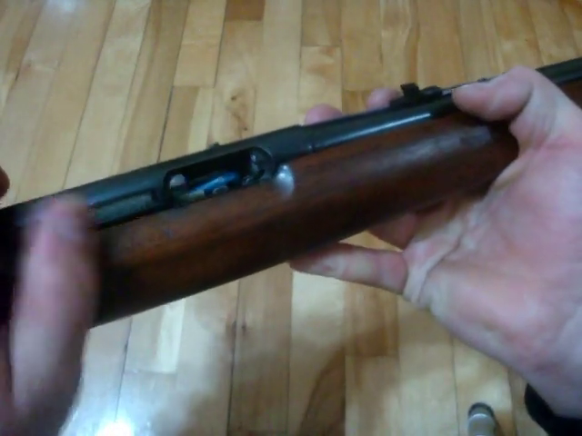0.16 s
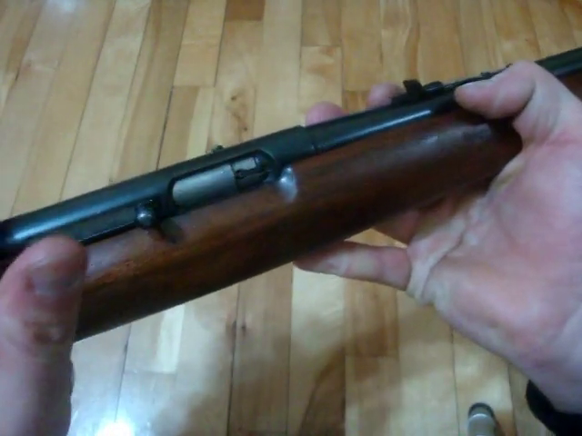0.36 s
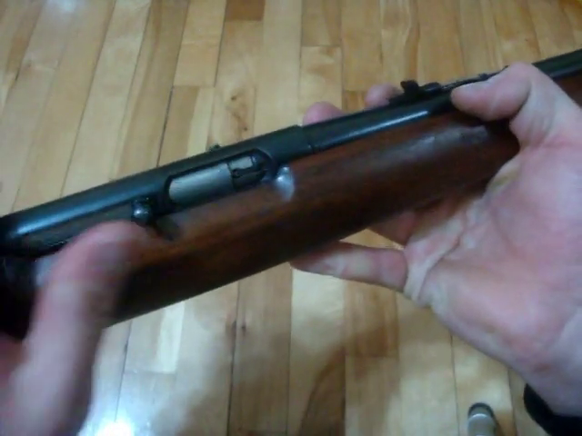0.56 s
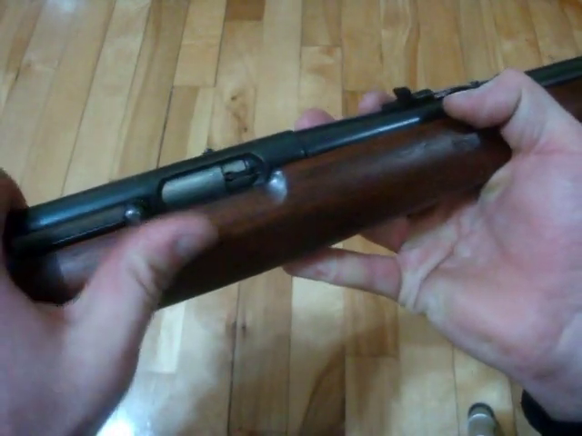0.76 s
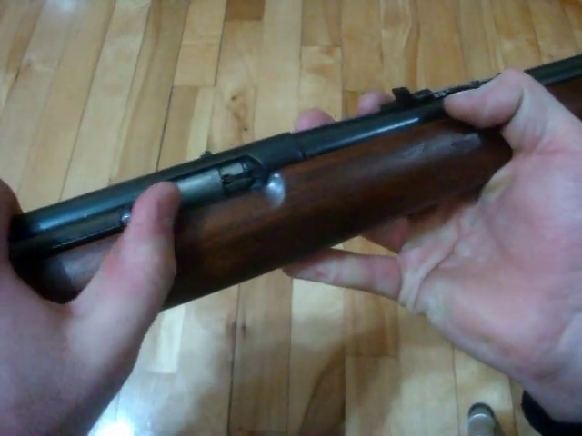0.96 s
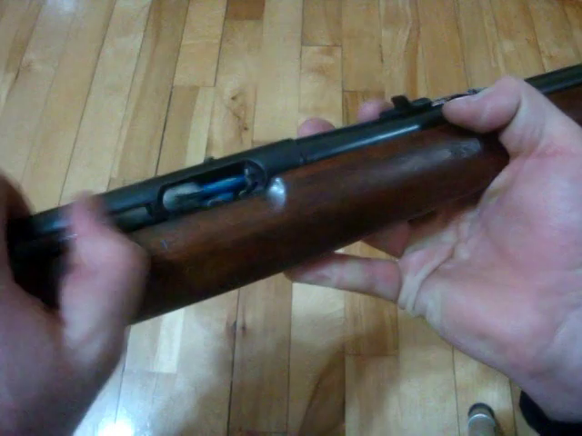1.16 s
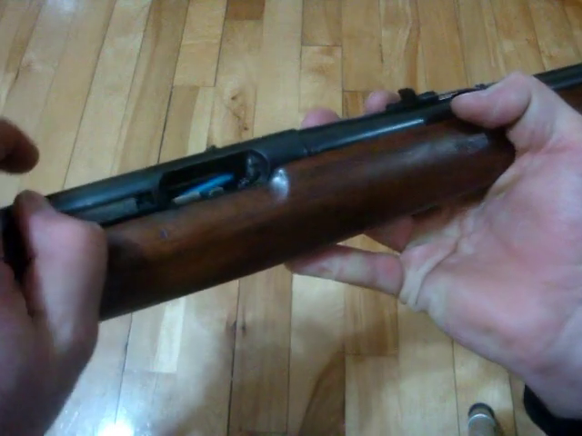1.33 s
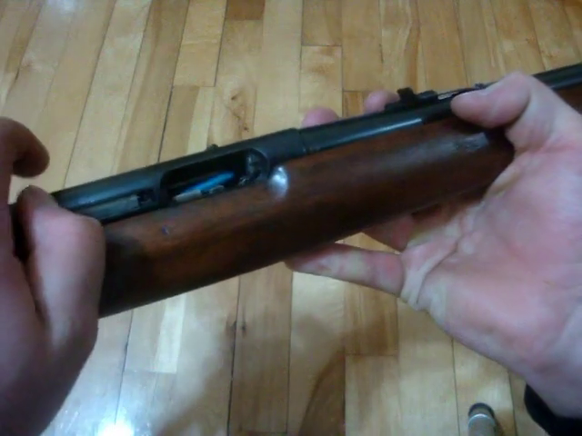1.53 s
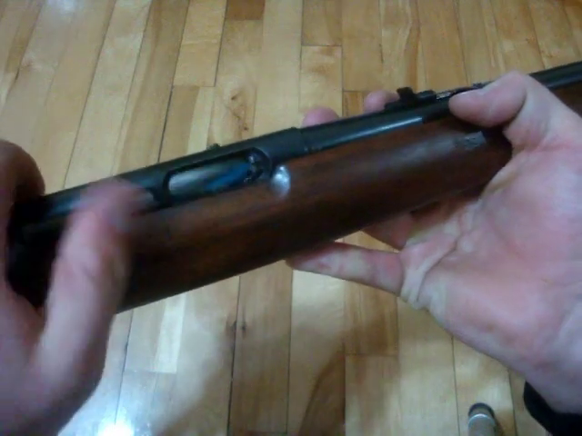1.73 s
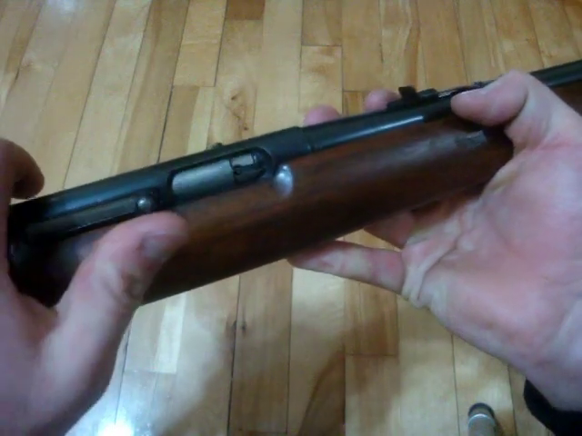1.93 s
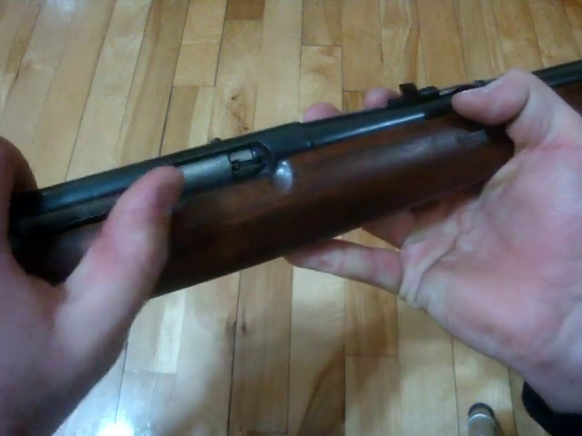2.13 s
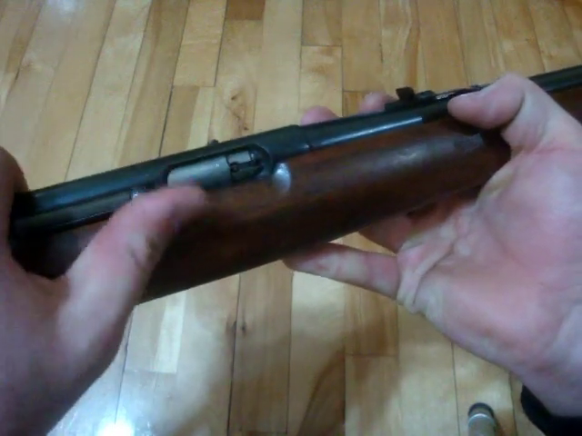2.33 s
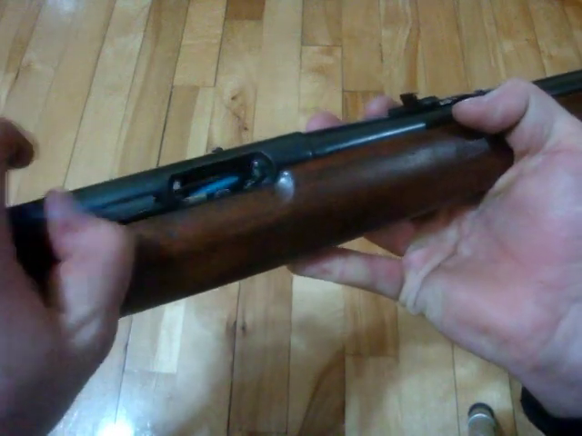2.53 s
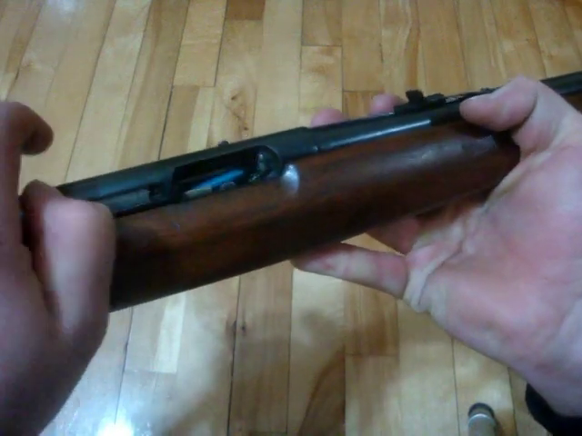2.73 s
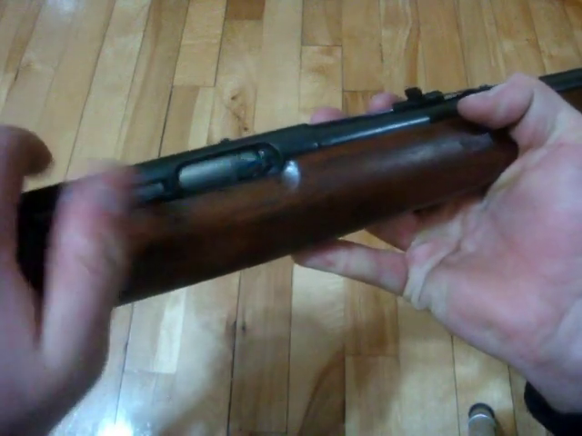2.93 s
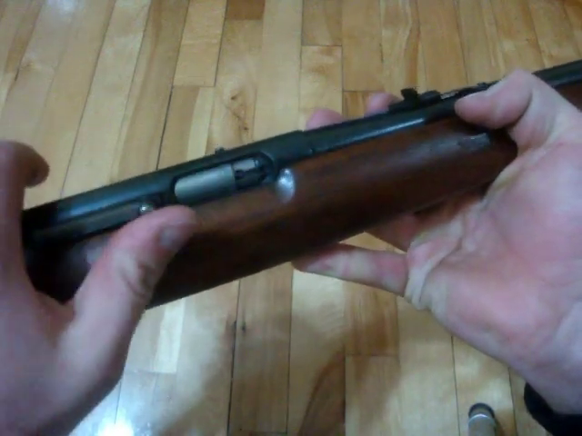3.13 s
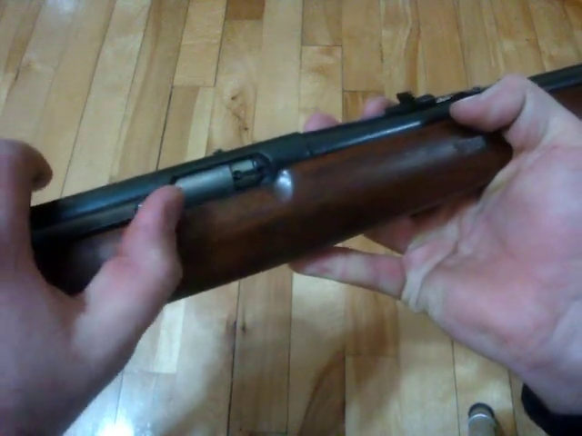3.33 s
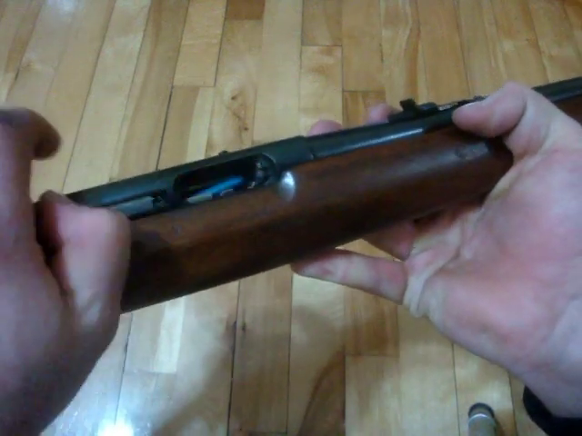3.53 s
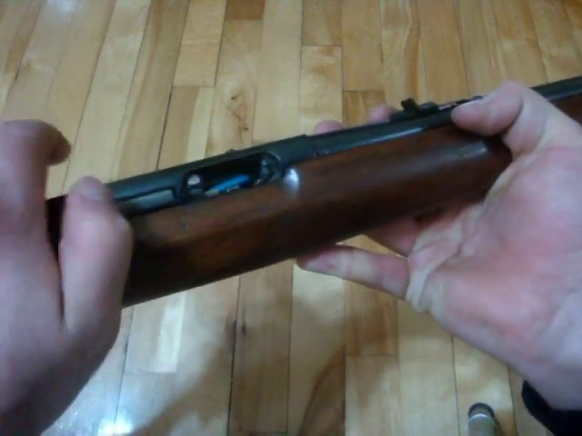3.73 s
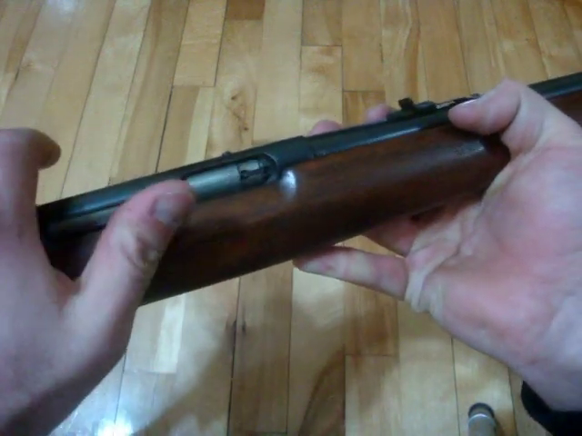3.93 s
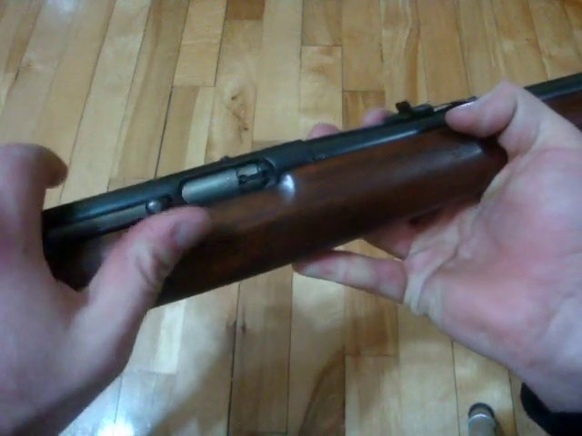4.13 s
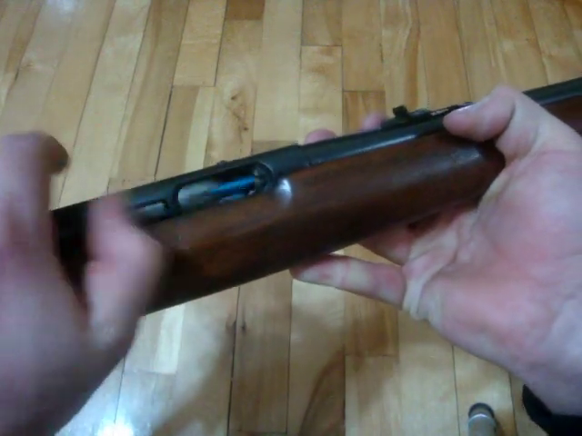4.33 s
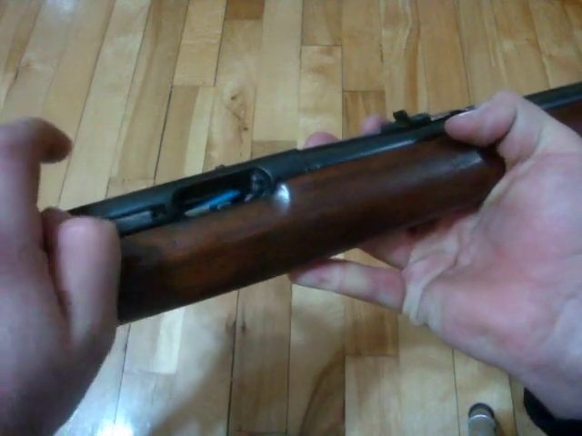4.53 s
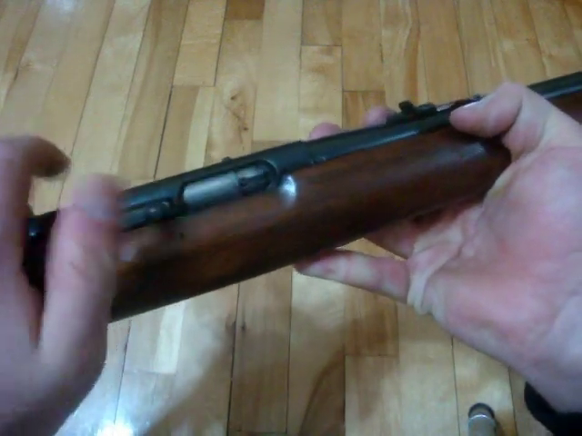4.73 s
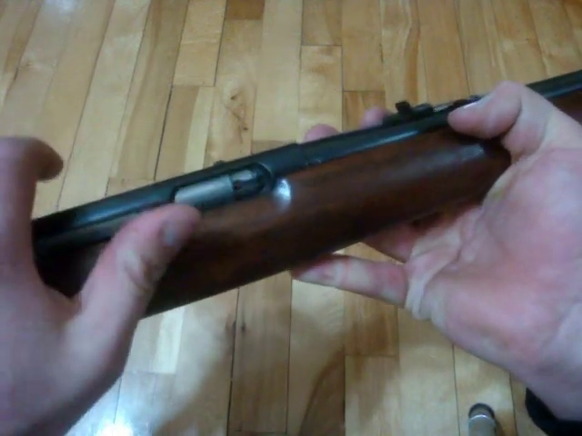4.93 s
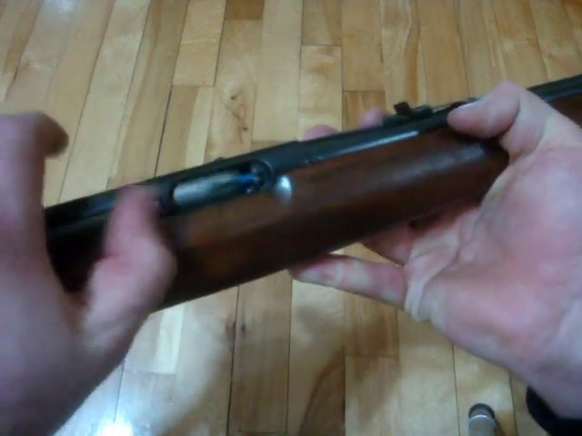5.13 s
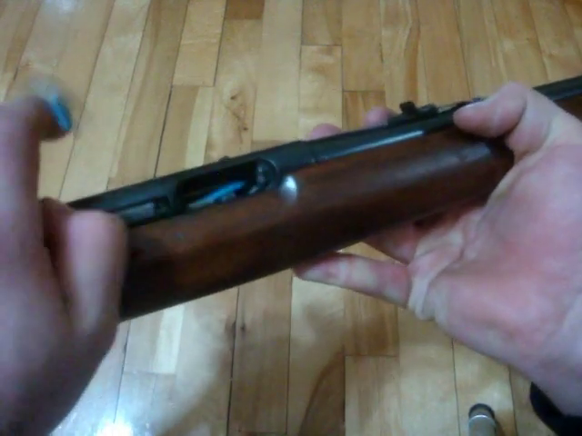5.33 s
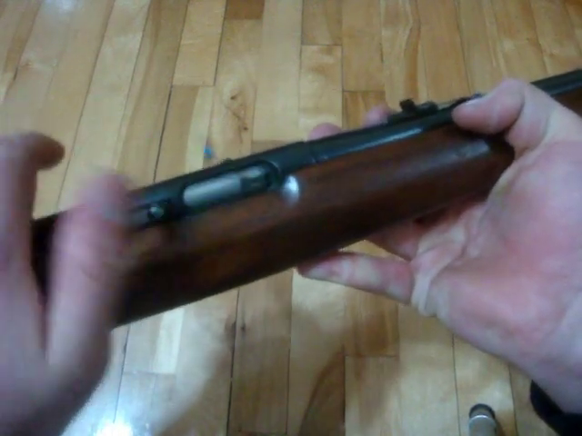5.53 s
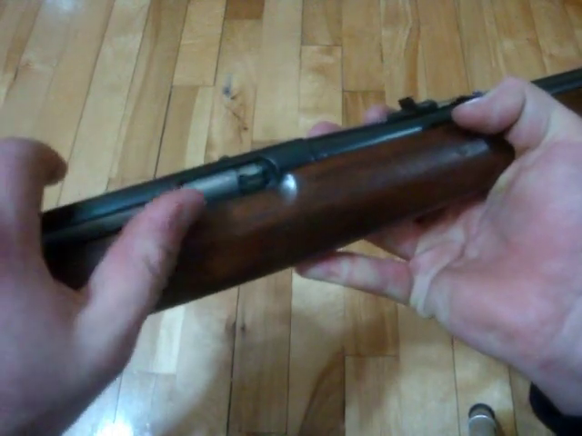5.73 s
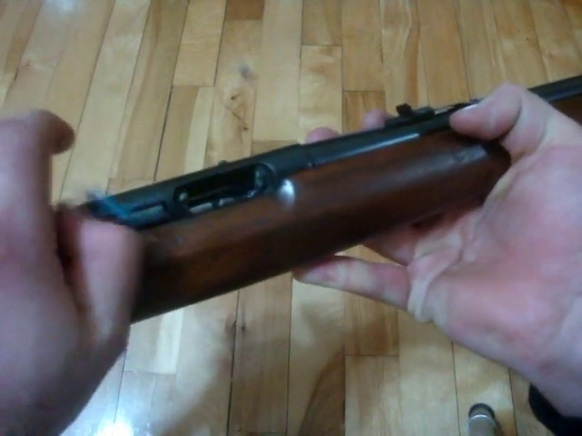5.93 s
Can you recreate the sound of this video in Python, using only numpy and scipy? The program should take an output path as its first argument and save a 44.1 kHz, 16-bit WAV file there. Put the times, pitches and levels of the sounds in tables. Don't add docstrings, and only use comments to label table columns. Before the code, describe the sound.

A rifle bolt is repeatedly pulled back and slammed shut in a bare room, with sharp metallic clacks and dummy rounds dropping on floorboards.

```python
import sys
import numpy as np
from scipy import signal
from scipy.fft import rfft, irfft, next_fast_len
from scipy.io import wavfile
from scipy.ndimage import uniform_filter1d, minimum_filter1d, map_coordinates

SR = 44100
rng = np.random.default_rng(int(sys.argv[2]) if len(sys.argv) > 2 else 0)


def decibels_to_gain(level_db):
    exponent = np.asarray(level_db, float) / 20
    return 10 ** exponent


def wav_out(sig):
    wavfile.write(sys.argv[1], SR, np.round(np.clip(np.atleast_2d(sig).T, -1, 1) * 32767).astype(np.int16))


N = 263718

# freq_hz, density_db_per_hz
HISS_SPECTRUM = [(15, -50), (25, -17), (235, -10.5), (410, -8), (694, -6.5), (4520, -6.5), (9800, -8),
                 (13500, -17)]
HISS_DB = -57
# freq_hz, density_db_per_hz
PALM_SPECTRUM = [(60, -20), (200, 3), (500, 3.5), (1200, 3), (2500, -14)]
# start_s, end_s, level_db
PALM_RUBS = [
    (-.1, 0.25, -52.5),
    (0.875, 1.16, -59.5),
    (5.625, 5.72, -47.5),
]
# freq_hz, width_hz, level_db
STEEL_MODES = [(1823, 71, -11.5), (2707, 580, -8.5), (3260, 127, -19.5), (3860, 200, -16), (5010, 170, -11),
               (6540, 1240, -9), (7340, 870, -19), (8800, 190, -9)]
# freq_hz, level_db
BLOW_SPECTRUM = [(60, -20), (300, -14.5), (800, -8.5), (1800, -3), (3000, -3), (5500, -2), (9500, -3),
                 (11500, -10.5)]
# freq_hz, t60_s
ROOM_DECAY = [(100, 1), (500, 0.36), (2000, 0.35), (5000, 0.39), (10000, 0.31)]
# freq_hz, level_db
ROOM_SPECTRUM = [(100, -13), (700, -2.5), (2500, -1), (5000, 2.5), (10000, -6)]
# time_s, level_db
TICKS = [(.164, -44), (.1808, -35), (1.143, -27), (1.3162, -44), (1.7154, -18.5), (2.3351, -36),
         (2.5114, -32), (3.4305, -34), (3.5598, -55), (3.662, -33), (3.79, -33), (4.4616, -28),
         (4.5923, -33), (4.616, -37), (4.6429, -35), (4.656, -30), (4.6924, -27), (5.2874, -30),
         (5.3083, -42), (5.3489, -32), (5.378, -31.5), (5.8723, -44)]
TICK_KIND = -8.5, -25, -8, 0
# freq_hz, level_db
SCRAPE_SPECTRUM = [(150, -16), (500, -15.5), (1000, 0), (2500, 1), (4000, 0), (5500, -17), (7000, -18.5)]
# freq_hz, density_db_per_hz
FIZZ_SPECTRUM = [(4000, -38), (5500, 11.5), (9500, -6), (11500, 0)]
# blow_s, length_s, end_level_db
RUN_UPS = [(0.2, 0.03, -30.5), (0.235, 0.031, -25), (1.128, 0.033, -39.5), (1.761, 0.025, -25.5),
           (2.46, 0.016, -35), (2.867, 0.026, -39), (2.938, 0.013, -21.5), (3.827, 0.016, -28),
           (4.734, 0.016, -27), (5.15, 0.013, -29)]
RUN_UP_RISE_DB, RUN_UP_HISS_DB = 10, -6
# start_s, end_s, end_level_db
RAIL_DRAGS = [(1.174, 1.224, -32), (2.51, 2.546, -31), (3.445, 3.493, -33), (4.356, 4.392, -29),
              (5.169, 5.24, -39.5), (5.22, 5.265, -36.5)]
DRAG_RISE_DB, DRAG_HISS_DB = 3.5, -2.5
# start_s, end_s, level_db
RUSTLES = [(1.212, 1.3, -42.5), (2.06, 2.439, -47), (2.552, 2.591, -43), (3.5, 3.818, -47),
           (4.375, 4.704, -50), (5.315, 5.42, -47), (5.839, 5.973, -42)]
RUSTLE_HISS_DB = -10.5
# time_s, level_db, treble_db
KNOCKS = [(.1887, -19, -12), (.1947, -12, -13), (1.278, -13, -17), (1.7015, -17.5, -14),
          (2.5945, -22, -17.5), (2.8704, -16, -13.5), (2.9135, -27.5, -16.5), (3.6728, -16.5, -16),
          (3.7758, -28.5, -14), (4.441, -17.5, -17), (4.6766, -13.5, -11.5), (4.7173, -27, -1),
          (5.2728, -13.5, -15.5), (5.4241, -14, -13), (5.4488, -22, -21)]
KNOCK_KIND = -37, -13, .015
# time_s, level_db, first_blow_db, extra_room_db
SLAMS = [
    (0.236, -13.5, 4, 1),
    (1.7597, -13.5, -2.5, 2),
    (2.9449, -14, 0, 0.5),
    (3.824, -14.5, 1.5, 0),
    (4.7362, -14, 0.5, 0),
    (5.4561, -16.5, 1.5, -1.5),
]
# delay_s, level_db, treble_db, room_share_db, rattle_t60_s
SLAM_RUN = [
    (0, -1, -3.5, -7, .015),
    (.009, -2, -14.5, -13.5, .025),
    (.0139, 2, -5.5, -15.5, .015),
    (.0289, 1.5, -3.5, -10.5, .017),
    (.041, -13, -7, -19, .04),
    (.05, -11.5, 3, -6.5, .055),
    (.065, -11.5, 7, -13, .025),
    (.082, -11, -8, -14.5, .05),
    (.12, -19, -10.5, -6, .05),
]
SLAM_THUD_DB, SLAM_SCATTER_DB = -31, 2.5
# time_s, level_db, treble_db, rattle_t60_s
PULLS = [(1.074, -27.5, -13.5, 0.017), (1.118, -23, 0.5, 0.032), (1.1268, -25, -9, 0.03),
         (1.163, -15, -8.5, 0.024), (1.1984, -24, -4, 0.047), (1.2164, -15.5, -10.5, 0.019),
         (2.4418, -26.5, -14.5, 0.013), (2.463, -18.5, -3.5, 0.027), (2.4953, -14.5, -8, 0.034),
         (2.525, -23.5, -9, .045), (2.538, -17, -13, .033), (3.408, -23, -7, 0.016),
         (3.4456, -18.5, -10, 0.038), (3.479, -20.5, -7.5, 0.028), (3.4917, -17.5, -8.5, 0.038),
         (4.2963, -28.5, -17, 0.015), (4.3183, -23.5, -3, 0.037), (4.349, -18, -4, 0.038),
         (4.3868, -17, -3.5, 0.02), (5.155, -17.5, -6, 0.028), (5.186, -22.5, -4, 0.033),
         (5.2076, -19.5, -11, .012), (5.22, -19, -3, 0.019), (5.8295, -36, -11, 0.023),
         (5.855, -29, -1, 0.04), (5.8826, -22.5, 4, 0.014), (5.9044, -18, -13.5, 0.03),
         (5.9214, -20.5, -10.5, 0.03), (5.951, -27.5, -17, 0.0093)]
PULL_THUD_DB, PULL_ROOM_DB = -31.5, -12.5
# time_s, level_db
SPRING_PLUCKS = [(1.218, -55), (2.54, -55.5), (3.5, -55), (4.39, -53.5), (5.22, -59)]
SPRING_HZ, SPRING_T60_S = 1140, 1.3
# time_s, level_db, treble_db, room_share_db
DROPS = [(1.6188, -16.5, -14.5, -5.5), (1.6333, -21.5, -22, -3), (1.6682, -16.5, -11.5, -26),
         (3.3224, -24.5, -12, -5), (3.3429, -30, -7, -9), (3.378, -33, -6, -17), (4.1996, -18.5, -9.5, -12),
         (4.2124, -24, -11, -9), (4.234, -41, -7, -19), (4.8903, -26, -5, -8), (5.0818, -21.5, -7.5, -9),
         (5.1173, -26.5, -16, -13), (5.639, -20.5, -12.5, -10), (5.6537, -28.5, -4, -8.5)]
DROP_KIND = -28, 0.023
# time_s, level_db
SKIPS = [(2.042, -36.5), (2.0513, -34.5), (2.1204, -40.5), (2.1585, -42), (2.2233, -49), (2.254, -45),
         (2.301, -51), (2.3206, -35), (2.382, -34), (3.606, -40), (3.7159, -39), (4.488, -38.5),
         (4.5063, -38.5), (4.5768, -35.5), (5.3967, -35)]
SKIP_KIND = -10, -23.5, -4, 0.1
# end_s, length_s, above_hz
STARVED = [(1.615, .015, 580), (3.317, .024, 1400), (5.077, .022, 550)]
STARVED_DB = -58
# end_s, length_s, above_hz
THINNED = [(1.1, .018, 3000), (1.31, .024, 2200), (2.04, .01, 5200), (3.665, .012, 2500),
           (3.811, .014, 2400), (4.574, .021, 4200), (4.712, .028, 4300), (5.144, .019, 4500),
           (5.305, .024, 4300), (5.44, .008, 2200), (5.826, .014, 2500), (5.9, .013, 3800)]
THINNED_DB = -12.5
# freq_hz, level_db
SIDE_SPECTRUM = [(100, -38), (400, -38), (1500, -52.5), (5000, -50), (10000, -37)]
TOP_HZ = 13200


def unit(x):
    return x / np.sqrt(np.mean(x ** 2) + 1e-20)


def along(points, hz):
    f, v = np.transpose(points)
    return np.interp(np.log(hz + 1), np.log(f + 1), v)


def wobble(rate_hz):
    knots = rng.standard_normal(int(N * rate_hz / SR) + 4)
    return map_coordinates(knots, [np.arange(N) * rate_hz / SR])


def filtered(x, response):
    m = next_fast_len(x.shape[-1] + 4096)
    return irfft(rfft(x, m) * response(np.fft.rfftfreq(m, 1 / SR)), m)[..., :x.shape[-1]]


def alike(rows, kind):
    return [(*row, *kind) for row in rows]


def palm():
    t = np.arange(N) / SR
    level = sum(decibels_to_gain(db) * np.sin(np.pi * np.clip((t - a) / (b - a), 0, 1)) for a, b, db in PALM_RUBS)
    grain = rng.standard_normal(N) * decibels_to_gain(0.75 * wobble(40))
    return level * unit(filtered(grain, lambda hz: decibels_to_gain(along(PALM_SPECTRUM, hz))))


def hiss():
    noise = unit(filtered(rng.standard_normal(N), lambda hz: decibels_to_gain(along(HISS_SPECTRUM, hz))))
    return decibels_to_gain(HISS_DB + 0.19 * wobble(2.0)) * noise


def steel(hz, ring_db, spread_db=0):
    response = 1
    for centre_hz, width_hz, db in STEEL_MODES:
        gain = decibels_to_gain(db + ring_db + spread_db * rng.standard_normal())
        damping = 1j * hz * width_hz
        response = response + gain * damping / (centre_hz * centre_hz - hz * hz + damping)
    return response


def room_tail(size):
    hz, t, z = signal.stft(rng.standard_normal(size), SR, nperseg=256)
    decay_db = along(ROOM_SPECTRUM, hz)[:, None] - 60 * t / along(ROOM_DECAY, hz)[:, None]
    tail = signal.istft(z * decibels_to_gain(decay_db), SR, nperseg=256)[1][:size]
    tail = tail * (1 - np.exp(-np.arange(size) / SR / 0.0023))
    return tail / np.linalg.norm(tail)


def contacts(table, ring_db, wet_db, swell):
    out, t = np.zeros(N + SR), np.arange(-512, 1536) / SR
    lead_in = .55 * np.exp(t / .001) + swell * np.exp(t / .0035)
    crack = 0.9 * np.exp(-np.abs(t - .0006) / 0.000098)
    for s, db, treble_db, thud_db, room_db, t60_s in table:
        chatter_db = 7.0 * uniform_filter1d(rng.standard_normal(len(t)), size=20)
        chatter = rng.standard_normal(len(t)) * decibels_to_gain(chatter_db)
        rattle = decibels_to_gain(-60 * np.abs(t / np.clip(0.88 * t60_s, .004, .08)) ** 1.27)
        shape = np.where(t < 0, lead_in, rattle)
        jolt = decibels_to_gain(1.61 * db + 11.5) * np.exp(-(t / 0.00099) ** 2)
        body_db = np.clip(-.9 * (treble_db + 11.0), 0, 13)
        tilt = [(300, thud_db + 27.5), (1200, 0.037), (2300, -.3 * body_db), (3250, body_db),
                (4300, -.7 * body_db), (7500, treble_db + 2.5)]
        colour = lambda hz: decibels_to_gain(along(BLOW_SPECTRUM, hz) + along(tilt, hz))
        hit = filtered(chatter * (shape + crack) + jolt,
                       lambda hz: colour(hz) * steel(hz, ring_db, spread_db=5))
        hit = decibels_to_gain(db - 2) * hit / np.sqrt(uniform_filter1d(hit ** 2, size=66).max())
        start = round(s * SR) - 512
        out[start:start + len(t)] += hit
        wet = filtered(room_tail(size=SR // 2), colour)
        wet_gain = decibels_to_gain(room_db + wet_db) * np.linalg.norm(hit) / np.linalg.norm(wet)
        out[start + 600:start + 600 + len(wet)] += wet_gain * wet
    return out[:N]


def light_contacts(table):
    return contacts(table, ring_db=10.0, wet_db=3.0, swell=0.16)


def hard_contacts(table):
    return contacts(table, ring_db=1, wet_db=8.5, swell=0.13)


def ticks():
    return light_contacts(alike(TICKS, TICK_KIND))


def strokes():
    run_ups = [(s - length, s, db - RUN_UP_RISE_DB, db, RUN_UP_HISS_DB) for s, length, db in RUN_UPS]
    drags = [(a, b, db - DRAG_RISE_DB, db, DRAG_HISS_DB) for a, b, db in RAIL_DRAGS]
    return run_ups + drags + [(a, b, db, db, RUSTLE_HISS_DB) for a, b, db in RUSTLES]


def sliding():
    t = np.arange(N) / SR
    scrape_level, fizz_level = np.zeros(N), np.zeros(N)
    for a, b, start_db, end_db, hiss_db in strokes():
        fade = np.clip(np.minimum((t - a) / 0.0058, (b - t) / 0.0019), 0, 1)
        moving = fade * decibels_to_gain(np.interp(t, [a, b], [start_db, end_db]))
        scrape_level += moving
        fizz_level += moving * decibels_to_gain(hiss_db)
    slips_db = 1.5 * wobble(60) + 3.4 * wobble(300)
    scrape = unit(filtered(rng.standard_normal(N) * decibels_to_gain(slips_db),
                           lambda hz: decibels_to_gain(along(SCRAPE_SPECTRUM, hz)) * steel(hz, ring_db=-7.0)))
    fizz = unit(filtered(rng.standard_normal(N) * decibels_to_gain(slips_db + 3.6 * wobble(72)),
                         lambda hz: decibels_to_gain(along(FIZZ_SPECTRUM, hz)) * (hz > 3000)))
    return scrape_level * scrape + fizz_level * fizz


def knocks():
    return light_contacts(alike(KNOCKS, KNOCK_KIND))


def slams():
    blows = []
    for s, slam_db, first_db, wet_db in SLAMS:
        for delay, step_db, treble_db, room_db, t60_s in SLAM_RUN:
            db = slam_db + step_db + first_db * (delay == 0) + SLAM_SCATTER_DB * rng.standard_normal()
            blows.append((s + delay, db, treble_db, SLAM_THUD_DB, room_db + wet_db, t60_s))
    return hard_contacts(blows)


def pulls():
    return light_contacts([(s, db, treble_db, PULL_THUD_DB, PULL_ROOM_DB, t60_s)
                           for s, db, treble_db, t60_s in PULLS])


def spring():
    t = np.arange(N) / SR
    level = sum(decibels_to_gain(db - 60 * (t - s) / SPRING_T60_S) * (t > s) * (t < s + .42)
                for s, db in SPRING_PLUCKS)
    return np.sqrt(2) * level * np.sin(2 * np.pi * SPRING_HZ * t)


def drops():
    thud_db, t60_s = DROP_KIND
    return hard_contacts([(s, db, treble_db, thud_db, room_db, t60_s)
                          for s, db, treble_db, room_db in DROPS])


def skips():
    return light_contacts(alike(SKIPS, SKIP_KIND))


def scene():
    bolt = ticks() + sliding() + knocks() + slams() + pulls() + spring()
    rounds = drops() + skips()
    return np.tile(palm() + hiss() + bolt + rounds, (2, 1))


def mask_weak_treble(z, hz, level_db):
    def blocks(rows, cols):
        draws = rng.standard_normal((z.shape[0] // rows + 1, z.shape[1] // cols + 1))
        return np.kron(draws, np.ones((rows, cols)))[:z.shape[0], :z.shape[1]]

    luck_db = 5 * blocks(2, 12) + 6 * blocks(2, 4)
    frame_db = level_db.max(axis=0)
    loudest_db = -minimum_filter1d(-frame_db, size=29)
    lull = loudest_db - frame_db > 9
    under_db = np.minimum(loudest_db - level_db - 21, 2.5) + luck_db
    return z * decibels_to_gain(-20 * np.clip(under_db / 2, 0, 1) * lull * (hz[:, None] > 2900))


def dull_before_blows(z, hz, t):
    for end, length, above_hz, db in alike(STARVED, [STARVED_DB]) + alike(THINNED, [THINNED_DB]):
        inside = np.clip(np.minimum(t - end + length, end - t) / 0.002 + .5, 0, 1)
        z = z * decibels_to_gain(db * inside * np.clip((hz[:, None] - above_hz) / 400 + .5, 0, 1))
    return z


def limit_top(x, bright_db):
    frames = bright_db[:len(bright_db) // 16 * 16].reshape(-1, 16).max(axis=1)
    chance_db = frames + 4 * rng.standard_normal(len(frames))
    opened = np.searchsorted(np.quantile(frames, [.1, .87, .985]), chance_db)
    hz, t, z = signal.stft(x, SR, nperseg=512)
    edge_hz = np.array([10600, 11250, 11900, 12600])[opened]
    edge_hz = np.resize(np.repeat(edge_hz, 4), len(t))
    return signal.istft(z * (hz[:, None] < edge_hz), SR, nperseg=512)[1][:N]


def top_cut(x):
    return signal.sosfilt(signal.butter(12, 13350, fs=SR, output="sos"), x)


def record(dry):
    shelf_db = [(9900, -0.5), (10250, -8.0), (13000, -11.0)]
    mono = filtered(dry[0], lambda hz: decibels_to_gain(along(shelf_db, hz)) * (hz < TOP_HZ))
    hz, t, z = signal.stft(mono, SR, nperseg=128)
    power = uniform_filter1d(uniform_filter1d(np.abs(z) ** 2, size=3, axis=0), size=5, axis=1)
    level_db = 10 * np.log10(np.abs(power) + 1e-14)
    z = dull_before_blows(mask_weak_treble(z, hz, level_db), hz, t)
    bright_db = level_db[(hz > 9000) & (hz < 11000)].mean(axis=0)
    mid = limit_top(signal.istft(z, SR, nperseg=128)[1], bright_db)
    side = filtered(mid, lambda hz: 1j * decibels_to_gain(along(SIDE_SPECTRUM, hz)))
    return top_cut(np.array([mid + side, mid - side]))


dry = scene()
out = record(dry)
wav_out(out)
```